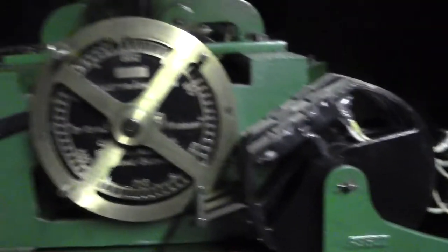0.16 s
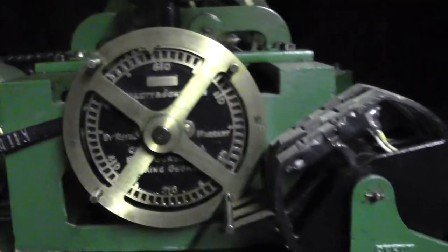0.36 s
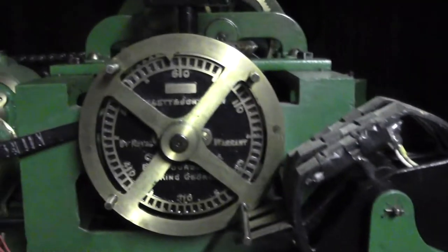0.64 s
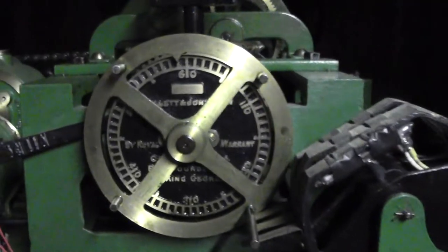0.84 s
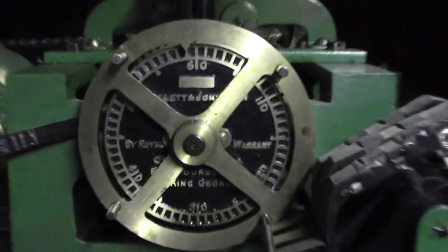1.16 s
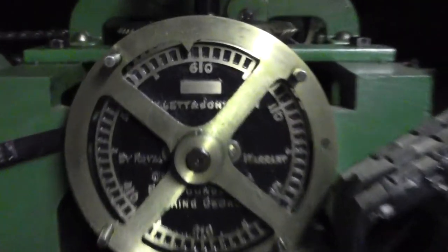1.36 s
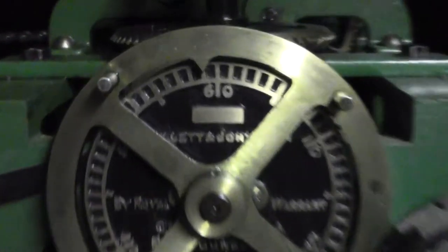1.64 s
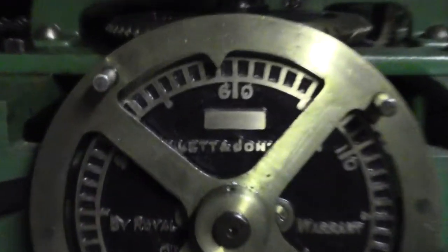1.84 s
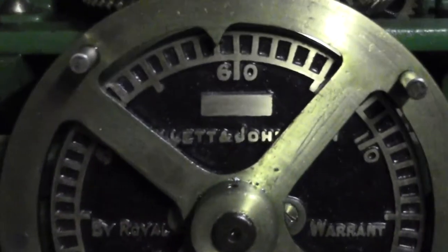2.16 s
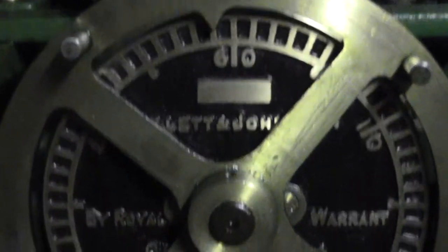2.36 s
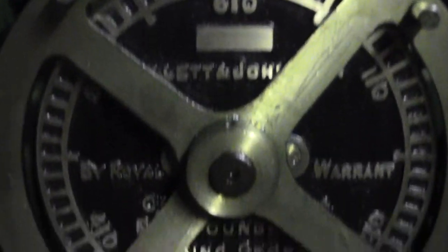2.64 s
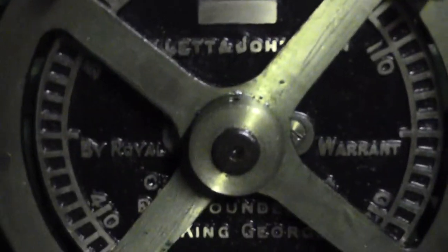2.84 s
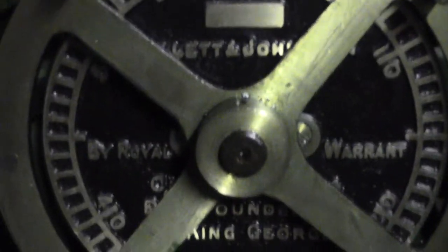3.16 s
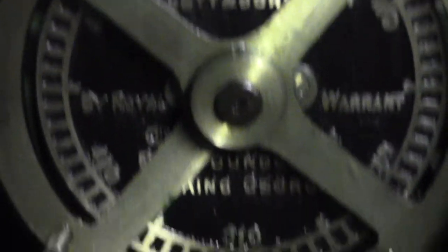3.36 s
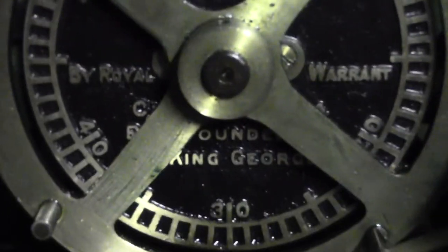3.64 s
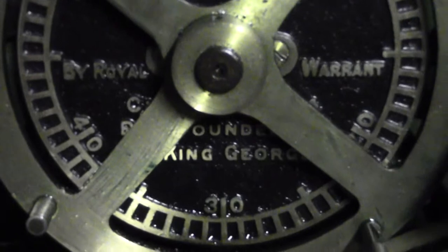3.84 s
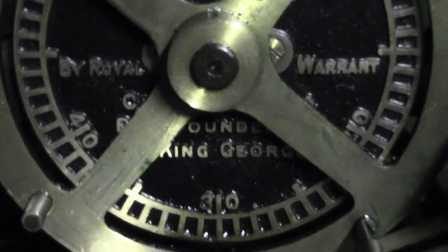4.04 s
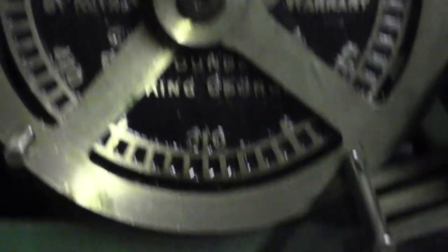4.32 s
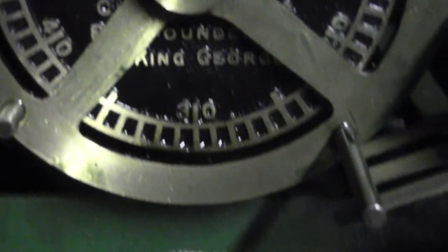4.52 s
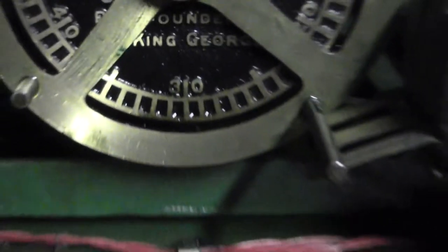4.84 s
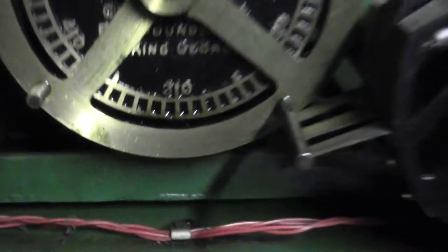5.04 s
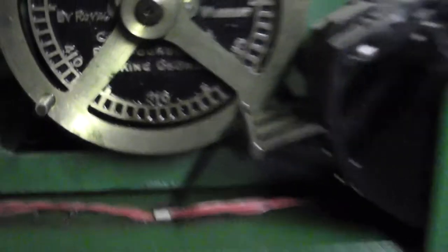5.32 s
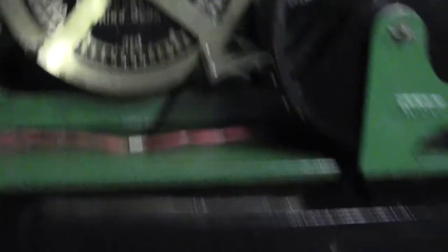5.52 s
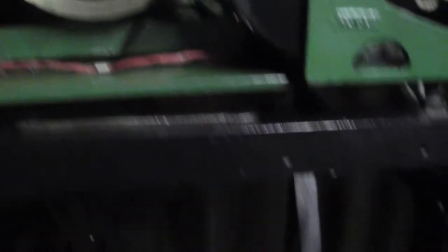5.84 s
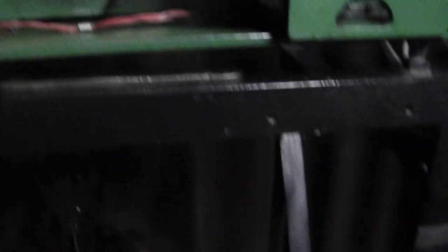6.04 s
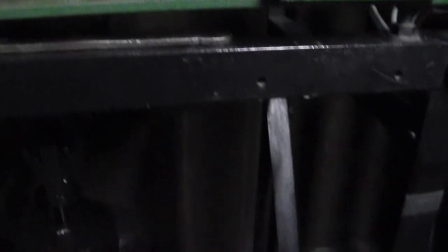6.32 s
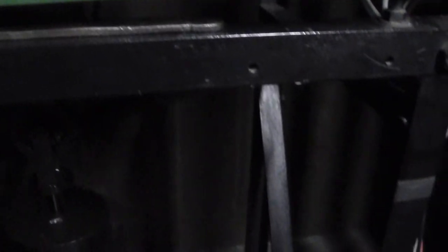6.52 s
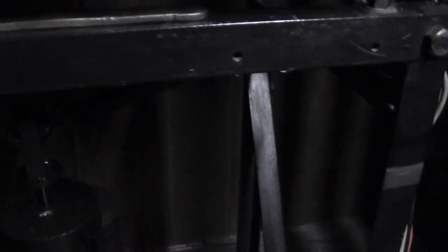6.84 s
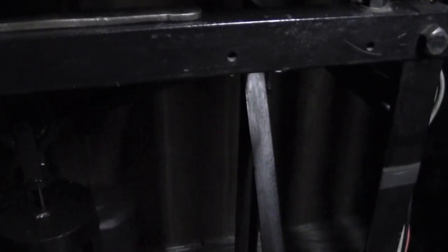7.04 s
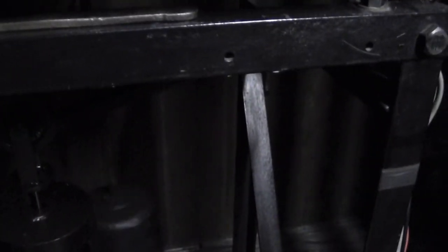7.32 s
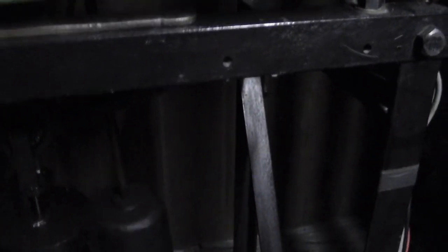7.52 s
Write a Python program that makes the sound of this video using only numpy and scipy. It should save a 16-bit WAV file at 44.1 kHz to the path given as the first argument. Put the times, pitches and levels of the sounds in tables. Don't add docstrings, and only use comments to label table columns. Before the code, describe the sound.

A heavy cast-iron clock movement runs close to a handheld microphone in a small, quiet stone-and-board room, over faint low road rumble and steady hiss. A soft double tap comes at 0.16 s. At about 0.7 s a bright click runs straight into a hard iron clack, then small rebounds and a brief metallic ring. This repeats each second, near 1.65, 2.7, 3.7, 4.75, 5.65 and 6.7, the two sides differing slightly; 4.77 is hardest, 6.74 loose and chattery. Quiet taps fall midway, near 1.15, 2.16, 3.15 and onward. A faint motor hum sounds from 0.95 to 2.05 and 4.7 to 5.75. A dull plastic click comes at 2.04, a sharp snap at 5.4. From 6 s low shuffling and thuds grow, with a snap at 6.9 and a faint shoe drag at 7 to 7.5. Finally cloth rustles, another unlocking click lands at 7.62, and a loud case knock at 7.65.

```python
import sys
import numpy as np
from scipy import signal
from scipy.fft import rfft, irfft
from scipy.io import wavfile
from scipy.ndimage import uniform_filter1d

SR = 44100
rng = np.random.default_rng(int(sys.argv[2]) if len(sys.argv) > 2 else 0)


def materialize(psi):
    bounded = np.clip(np.atleast_2d(psi).T, -1, 1)
    quanta = np.round(bounded * 32767).astype(np.int16)
    wavfile.write(sys.argv[1], SR, quanta)


def ratio(d):
    e = np.asarray(d, float) / 20
    return 10 ** e


N = 338688
TAIL = SR // 2

# (time [s], peak [dB], chatter [ms], treble over its kind's [dB])
LOCKS_A = [
    (0.753, -10, 4, -0.5),
    (2.745, -7.5, 7.3, -1),
    (4.7676, -6.5, 8, 0),
    (6.7356, -11.5, 18, -2),
]
LOCKS_B = [
    (1.6853, -7, 6.5, -1.3),
    (3.718, -8, 2.5, -1.5),
    (5.666, -7.5, 10.7, -2.3),
]
# (time [s], peak [dB], chatter [ms])
ARMS_A = [
    (1.1515, -29, 2.6),
    (3.151, -31.5, 2.9),
    (5.1512, -32, 4.7),
    (7.151, -30.5, 17),
]
ARMS_B = [
    (0.1604, -30, 2.4),
    (0.1894, -36, 7.3),
    (2.1586, -30, 3.8),
    (2.1869, -35, 3.7),
    (4.159, -29, 3.1),
    (4.187, -35.5, 4),
    (6.1584, -34, 5.2),
    (6.1894, -35.5, 4),
]


def level(x, db):
    return x * ratio(db) / np.sqrt(np.mean(x ** 2))


def peak(x, db):
    return x * ratio(db) / np.max(np.abs(x))


def read(table, hz):
    f, v = np.transpose(table)
    return np.interp(np.log(np.maximum(hz, 1)), np.log(f), v)


def band(x, lo_hz, hi_hz):
    return signal.sosfilt(signal.butter(2, [lo_hz, min(hi_hz, .45 * SR)], "band", fs=SR, output="sos"), x)


def coloured(spectrum):
    return irfft(rfft(rng.standard_normal(N)) * ratio(read(spectrum, np.fft.rfftfreq(N, 1 / SR))), N)


def walk(rate):
    k = int(SR / rate)
    steps = np.repeat(rng.standard_normal(N // k + 1), k)
    return level(uniform_filter1d(uniform_filter1d(steps, k), k)[:N], 0)


def fade(t60):
    return ratio(-60 * np.arange(TAIL) / SR / np.clip(t60, .003, .5))


def add(out, s, x):
    i = int(s * SR)
    out[..., i:i + x.shape[-1]] += x[..., :N - i]


def clock():
    # (time [s], peak [dB], chatter [ms])
    unlocks_a = [
        (0.688, -18.5, 6.8),
        (2.6806, -18.5, 4.1),
        (4.7082, -16.5, 6.8),
        (6.6737, -16.5, 2.8),
    ]
    unlocks_b = [
        (1.6228, -15.5, 2.4),
        (3.6344, -15.5, 2.7),
        (5.6006, -15.5, 5),
        (7.6231, -18.5, 6.5),
    ]
    rebounds_a = [(0.7209, -24, 3.5), (0.8244, -18, 2), (0.8624, -23.5, 3), (0.8844, -26.5, 8.6),
                  (2.7145, -23, 10), (2.8034, -24.5, 8.2), (2.8382, -21.5, 11), (4.7394, -29, 3.4),
                  (4.8144, -25.5, 6.4), (4.8481, -24, 20), (6.7064, -26.5, 17), (6.8087, -19, 3),
                  (6.8502, -24.5, 33)]
    rebounds_b = [(1.6641, -16, 3), (1.7432, -20, 5.9), (1.8023, -26, 8), (3.6715, -17, 2.2),
                  (3.7744, -23, 6.9), (3.8348, -25.5, 8.3), (3.8646, -28, 3.4), (5.6431, -20.5, 5.8),
                  (5.7317, -20.5, 4.1), (5.7745, -24.5, 2.6), (7.6664, -23.5, 10)]
    # (frequency [Hz], level [dB], t60 [s])
    unlock_a_modes = [(810, -20, .15), (1755, -13, .07), (3110, -9, .05), (2530, -4, .06), (2745, 0, .06),
                      (3736, -14, .15), (4194, -14, .08), (5110, -14, .06), (6998, -26, .14),
                      (7800, -26, .06), (10170, -30, .1), (11090, -30, .06), (13770, -36, .15)]
    unlock_b_modes = [(420, -18, .12), (851, -18, .2), (1540, -6, .07), (2132, -4, .06), (2745, 0, .075),
                      (2998, -8, .08), (3515, -18, .12), (4161, -14, .1), (5238, -22, .1), (6794, -28, .12),
                      (7763, -24, .08), (12970, -32, .05)]
    lock_a_modes = [(440, -8, .15), (964, -12, .18), (1346, -12, .25), (1663, -13, .2), (1760, -10, .2),
                    (2229, -12, .15), (2439, -5, .09), (2708, 0, .08), (2907, -12, .15), (3650, -20, .2),
                    (6971, -25, .16), (7865, -20, .1), (8538, -22, .12), (9114, -12, .13),
                    (10070, -16, .14), (11150, -28, .13), (12660, -28, .13), (13700, -23, .14)]
    lock_b_modes = [(430, -14, .15), (646, -13, .25), (824, -9, .25), (974, -12, .19), (1184, -13, .2),
                    (1540, -5, .15), (1610, -3, .06), (1992, -5, .09), (2110, -7, .08), (2460, -9, .1),
                    (2729, 0, .06), (4210, -20, .12), (4780, -20, .12), (6907, -23, .14), (7865, -24, .13),
                    (8522, -22, .12), (10190, -15, .07), (13910, -21, .1)]
    rebound_a_modes = [(470, -13, .13), (960, -13, .13), (1760, -9, .12), (2450, -2.5, .1),
                       (2740, -2.5, .12), (3640, -7.5, .17), (3790, -7, .07), (6970, -28, .14),
                       (10150, -28, .13), (11100, -26, .05), (13750, -29, .13)]
    rebound_b_modes = [(430, -14, .12), (830, -9, .2), (1550, -3.5, .1), (2130, -2.5, .08),
                       (2460, -2.5, .12), (2740, 0, .1), (3000, -5, .12), (3500, -11, .12),
                       (6900, -24, .15)]
    arm_a_modes = [(646, -11, .25), (780, -4, .35), (1760, -3, .08), (2030, -9, .14), (2740, -11, .1),
                   (3000, -1, .14)]
    arm_b_modes = [(646, -8, .2), (813, -3, .25), (1430, -16, .15), (2140, 0, .075), (2420, -11, .08),
                   (2780, -13, .08), (4430, -17, .06)]
    # (bass [dB], upper [dB], treble [dB]) against its body
    unlock_a_db = (-14.5, -1.5, -13)
    unlock_b_db = (-13, -8.5, -16)
    lock_a_db = (-6, -12, 1.2)
    lock_b_db = (-6.5, -13.5, 1)
    rebound_a_db = (-5.5, -5, -7.5)
    rebound_b_db = (-10, -12, -16)
    arm_a_db = (-13.5, -18, -16)
    arm_b_db = (-11.5, -22, -18)
    # (frequency [Hz], density [dB per Hz])
    soft = [(250, -24), (420, -13), (1200, -9), (2000, -5), (2800, 0), (3600, -7), (4800, -11), (6000, -19),
            (11000, -25), (16000, -38)]
    hard = [(250, -24), (420, -5), (900, -2), (1600, 0), (2700, 0), (4200, -13), (6000, -14), (9500, -11),
            (13000, -17.5), (16000, -26)]

    unlock = blows(unlocks_a, unlock_a_db, unlock_a_modes, soft, hiss_db=0.5)
    unlock += blows(unlocks_b, unlock_b_db, unlock_b_modes, soft, hiss_db=0.27)
    lock = blows(LOCKS_A, lock_a_db, lock_a_modes, hard, hiss_db=0.77)
    lock += blows(LOCKS_B, lock_b_db, lock_b_modes, hard, hiss_db=6.4)
    rebound = blows(rebounds_a, rebound_a_db, rebound_a_modes, soft, hiss_db=0.82)
    rebound += blows(rebounds_b, rebound_b_db, rebound_b_modes, soft, hiss_db=0.45)
    arm = blows(ARMS_A, arm_a_db, arm_a_modes, soft, hiss_db=-10.5)
    arm += blows(ARMS_B, arm_b_db, arm_b_modes, soft, hiss_db=-10.0, ring_share=0.75)
    return unlock + lock + rebound + arm


def blows(events, colour_db, modes, frame, hiss_db, ring_share=1):
    # (frequency [Hz], t60 [s])
    frame_t60 = [(300, 0.85), (1000, 0.22), (2500, 0.12), (6000, 0.2), (14000, 0.23)]
    bands_hz = 250 * 2 ** np.arange(0, 6.1, .5)
    out, t = np.zeros(N), np.arange(TAIL) / SR
    hz, db, t60 = np.transpose(modes)[:, :, None]
    t60 = t60 * ring_share
    decay = fade(0.42 * t60) + ratio(-3) * fade(t60)
    off_mode = (np.fft.rfftfreq(TAIL, 1 / SR) - hz) / (.013 * hz + 30)
    resonance = ratio(-6) + np.sum(1 / (1 + off_mode ** 2), axis=0)
    weight = ratio(read(frame, bands_hz)) * np.sqrt(bands_hz) * (-1) ** np.arange(len(bands_hz))
    bass_db, upper_db, treble_db = colour_db
    for s, peak_db, chatter_ms, *bright_db in events:
        size, split = rng.standard_normal((2, len(modes), 1))
        beat_hz = hz * .012 * (split + .4 * np.sign(split))
        pair = 1 + .5 * np.cos(2 * np.pi * beat_hz * t)
        jolts = np.repeat(rng.standard_normal((len(modes), TAIL // 256 + 1)), 256, axis=1)[:, :TAIL]
        pair = pair * (1 + np.minimum(t / .02, .9) * uniform_filter1d(jolts, size=256, axis=1))
        strength = ratio(db + 2 * size + 5.5 * (hz > 6000))
        ring = np.sum(strength * np.sin(2 * np.pi * hz * t) * pair * decay, axis=0)

        late = np.maximum(np.arange(TAIL) - int(chatter_ms * SR / 1000), 0)
        fine_grain_db = 1.33 * np.repeat(rng.standard_normal(TAIL // 30 + 1), 30)[:TAIL]
        coarse_grain_db = .8 * np.repeat(rng.standard_normal(TAIL // 64 + 1), 64)[:TAIL]
        noise = rng.standard_normal(TAIL) * ratio(fine_grain_db)
        noise = irfft(rfft(noise) * resonance, TAIL) * ratio(coarse_grain_db)
        noise = noise * (fade(0.021)[late] + ratio(11.5))
        hiss = np.zeros(TAIL)
        for f, w in zip(bands_hz, weight):
            strip = level(band(noise, f / 1.254, f * 1.098), 0)
            hiss += w * strip * fade(read(frame_t60, f))[late]

        x = (level(ring, 0) + level(hiss, hiss_db)) * (1 - np.exp(-t / 0.001))
        body, treble = again(s)
        swell = 1 - 0.61 * np.exp(-t / 0.0077)
        parts = peak(band(x * body, 1200, 3400), 0)
        parts -= peak(band(x * swell, 250, 1100), bass_db)
        parts += peak(band(x * treble, 6000, 16500), treble_db + sum(bright_db))
        parts -= peak(band(x * body, 3400, 6000), min(upper_db, -5))
        add(out, s, peak(favour(parts, s), peak_db + 3.0))
    return out


def again(s):
    # (time of the blow [s], delay [ms], body over ring [dB], treble over ring [dB])
    restrikes = [(.16, 5.1, 0, 9), (.688, 9.5, -8, 0), (.753, 7.2, -5, -7), (.753, 23, -6, 0),
                 (1.685, 6, 2, -2), (2.16, 6, 7, -6), (2.681, 16, -9, -4), (2.745, 11.5, -3, -7),
                 (3.634, 9.8, -8, 0), (3.718, 8, 2, -4), (4.16, 4.5, 2, -6), (4.708, 9, -1, -4),
                 (4.768, 4.8, 2, -20), (5.601, 9.6, -3, -8), (5.666, 11.4, -2, -1), (6.158, 8.5, 8, -6),
                 (6.674, 9, -3, 0), (6.735, 12, -2.5, 2), (7.623, 8.5, 2, -3), (6.809, 6, 6, -6)]
    crack = fade(0.027)
    body, treble = 1 + ratio(-4) * crack, 1 + ratio(0.5) * crack
    for at, delay_ms, body_db, treble_db in restrikes:
        if abs(at - s) < .006:
            jolt = np.roll(fade(0.046), int(delay_ms * SR / 1000))
            body, treble = body + ratio(body_db) * jolt, treble + ratio(treble_db) * jolt
    return body, treble


def favour(x, s):
    # (time of the blow [s], frequency [Hz], gain [dB])
    favours_main = [(0.688, 1780, -10), (0.688, 2010, -10.0), (0.688, 3120, 6), (0.688, 4880, -10.0),
                    (0.753, 570, -10.0), (0.753, 2400, -10.0), (0.753, 2680, -8), (1.623, 674, 12),
                    (1.623, 1800, 10.0), (1.623, 2060, 8), (1.623, 4250, -9.0), (1.685, 1240, -10.0),
                    (1.685, 1550, 5), (1.685, 2030, -10.0), (1.685, 2540, -12), (2.681, 1590, 5),
                    (2.681, 2080, 13), (2.681, 2700, 12), (2.681, 3010, 11), (2.745, 570, -9.0),
                    (2.745, 1410, -8), (2.745, 1960, 16.5), (2.745, 2250, -10), (3.634, 1540, -9),
                    (3.634, 2030, 8), (3.634, 3130, 7), (3.634, 3400, -10.0), (3.718, 1200, -17),
                    (3.718, 1540, 6), (3.718, 1800, 9.0), (3.718, 2720, 8), (4.708, 1990, -10.0),
                    (4.708, 2810, 14.5), (4.708, 3140, 14), (4.708, 4080, 10.0), (4.768, 420, -12),
                    (4.768, 1550, 7), (4.768, 1930, 9.0), (4.768, 2624, 17), (5.601, 1510, -9.0),
                    (5.601, 2570, -21), (5.601, 3080, -12), (5.601, 4060, 17), (5.666, 655, -8),
                    (5.666, 1120, -10), (5.666, 1500, -11), (5.666, 1930, 8.0), (6.674, 2760, 12.5),
                    (6.674, 3230, 16), (6.674, 3720, -10.0), (6.674, 4170, 18), (6.735, 1020, -14),
                    (6.735, 1400, -12), (6.735, 1700, -14), (6.735, 2460, 10.5), (7.623, 1480, -6.0),
                    (7.623, 2190, -7.0), (7.623, 2460, 21), (7.623, 2930, 7)]
    favours_small = [(0.16, 1330, -10.0), (0.16, 2380, -12), (0.721, 533, -15), (0.721, 2970, 12),
                     (0.824, 2510, -10.0), (0.824, 3820, 15), (0.862, 950, -12), (0.862, 2480, -10.0),
                     (1.151, 730, -11), (1.151, 2885, 16.5), (1.664, 880, -7), (1.664, 2080, 10.0),
                     (1.743, 870, -9.0), (1.743, 2240, -10.0), (2.16, 865, -11), (2.16, 1950, 13),
                     (2.187, 1280, 10.0), (2.187, 2420, 8.0), (2.717, 950, -10.0), (2.717, 2470, -10.0),
                     (2.803, 600, -9.0), (2.803, 2650, 10.0), (2.838, 1800, -10.0), (2.838, 3590, 10.0),
                     (3.151, 3000, 9), (3.671, 1560, -9.0), (3.671, 2030, 14), (3.774, 1780, 11),
                     (3.774, 2500, -8.0), (4.16, 920, -8), (4.16, 2320, -13), (4.814, 1720, -5.0),
                     (4.814, 2900, 15), (4.848, 2360, 12), (5.152, 360, 8.0), (5.152, 770, -13),
                     (5.643, 1700, 14), (5.643, 2460, 13), (5.732, 1990, 16), (6.158, 790, -13),
                     (6.158, 2010, 11), (6.189, 640, -14), (6.189, 1360, 22), (6.809, 1690, -6),
                     (6.809, 2400, 18), (6.85, 960, -14), (6.85, 2450, 9), (7.148, 830, -13)]
    favours_fine = [(0.189, 2080, -6.0), (0.688, 1820, -8.0), (0.688, 4280, -10.0), (0.753, 390, 6),
                    (0.753, 2900, 9), (0.862, 3900, -10.0), (0.884, 1410, 16), (1.623, 4170, -8.0),
                    (1.685, 2940, 12), (2.681, 2930, 8.0), (2.681, 3200, 10.0), (2.745, 2080, 10.0),
                    (2.745, 2610, 13), (3.634, 3520, -10), (3.634, 5180, 8), (3.718, 1550, 8.5),
                    (3.718, 2240, -10.0), (3.718, 5640, 15), (3.865, 2600, 12), (4.187, 2140, -9),
                    (4.708, 2140, 9.0), (4.768, 1050, 5.5), (4.768, 1990, 8), (4.768, 2310, 8),
                    (5.601, 1850, -11), (5.601, 3080, -9.0), (5.666, 467, 9), (5.666, 2700, 9.5),
                    (5.666, 2960, 11), (6.674, 2470, 8), (6.674, 2920, 8), (6.735, 970, -9),
                    (6.735, 1230, -10.0), (6.735, 2560, 7), (6.809, 2500, 12)]
    share, width_hz, t60_s = 0.66, 98, 0.21
    for at, hz, db in favours_main + favours_small + favours_fine:
        if abs(at - s) < .006:
            x = x + (ratio(share * db) - 1) * band(x, hz - width_hz, hz + width_hz) * fade(t60_s)
    return x


def stand():
    out, t = np.zeros(N), np.arange(TAIL) / SR
    for s, peak_db, *_ in LOCKS_A + LOCKS_B:
        shake = band(rng.standard_normal(TAIL), 71, 293) * fade(0.63) * (1 - np.exp(-t / 0.0096))
        add(out, s, peak(shake, peak_db - 29.5))
    for s, peak_db, _ in ARMS_A + ARMS_B:
        thud = band(rng.standard_normal(TAIL), 376, 830) * fade(0.6) * (1 - np.exp(-t / 0.018))
        add(out, s, peak(thud, peak_db - 10))
    return out


def ticks():
    # (time [s], peak [dB], centre [Hz], t60 [s])
    contacts = [(1.1543, -44, 11500, .02), (2.167, -36, 9000, .012), (2.1722, -41, 10500, .05),
                (3.1543, -44, 11500, .02), (4.1668, -45, 11500, .012), (4.1715, -41, 11500, .04),
                (5.1547, -36, 12000, .012), (7.1545, -43, 13000, .012), (7.149, -40, 4900, .07),
                (6.158, -43, 4700, .09), (6.521, -41, 2050, .25), (6.9, -25, 5000, .014),
                (6.518, -38, 950, .12)]
    out = np.zeros(N)
    for s, db, hz, t60 in contacts:
        add(out, s, peak(band(rng.standard_normal(TAIL), hz / 1.3, hz * 1.3) * fade(t60), db))
    return out


def case():
    # (time [s], peak [dB], pitch [Hz], t60 [s], treble snap over it [dB])
    clicks = [
        (2.0405, -26, 1080, 0.014, -24),
        (4.643, -47, 1750, 0.012, -19),
        (3.9, -44, 1300, 0.02, -40),
        (5.3998, -22, 1300, 0.025, 7),
        (6.9, -21, 1700, 0.016, 0),
        (7.5698, -24, 2900, 0.0097, 2),
        (7.6526, -14, 1380, 0.0093, -7),
        (7.6764, -22.5, 4300, 0.013, 4),
        (7.5905, -29.5, 1160, .006, -25),
        (7.5, -38.5, 1400, .07, -30),
    ]
    out = np.zeros(N)
    for s, db, hz, t60, snap_db in clicks:
        noise = rng.standard_normal(TAIL)
        add(out, s, peak(band(noise, hz / 1.63, hz * 1.68) * fade(t60), db))
        add(out, s, peak(band(noise, 3200, 11500) * fade(0.3 * t60), db + snap_db))
    return out


def handling():
    # (time [s], peak [dB], pitch [Hz], t60 [s], scuff over it [dB])
    thumps = [(4.082, -41, 117, 0.5, 0.5), (4.19, -33, 258, 0.36, -15), (5.4, -29.5, 222, 0.021, 4.5),
              (5.502, -35.5, 203, 0.31, -17), (6.325, -33, 296, 0.35, -9), (6.355, -39, 508, 0.088, -9),
              (6.518, -27.5, 291, 0.14, -22), (6.53, -32, 115.4, 0.48, -30), (6.639, -30, 112, 0.12, -30),
              (6.04, -38.5, 557, 0.11, 0), (6.611, -31.5, 596, 0.16, -8), (7.375, -36, 416, 0.61, -22),
              (7.5905, -23, 163, 0.024, -19), (7.652, -13.5, 252, 0.095, -2)]
    # (start [s], length [s], rustle [dB], dull rub over it [dB])
    brushes = [
        (2.552, 0.092, -47, 7),
        (4.075, 0.096, -54.5, 12.5),
        (5.98, 0.14, -56.5, -6),
        (7.54, 0.2, -44, -5),
    ]
    out, t = np.zeros(N), np.arange(TAIL) / SR
    for s, db, hz, t60, scuff_db in thumps:
        noise = rng.standard_normal(TAIL)
        knock = np.sin(2 * np.pi * hz * t) + 1.3 * level(band(noise, hz / 1.47, hz * 1.84), 0)
        scuff = band(noise, 210, 3130) * fade(1.05 * t60)
        add(out, s, peak(knock * fade(t60), db) + peak(scuff, db + scuff_db))
    cloth = rng.standard_normal(N) * ratio(2.4 * walk(460) + 1.1 * walk(60))
    cloth = level(band(cloth, 1500, 9400), 0.66)
    rub = level(band(rng.standard_normal(N) * ratio(2.0 * walk(120)), 320, 1060), -2.7)
    for s, length, db, rub_db in brushes:
        times = s + length * np.array([0, .25, 1])
        shape_db = np.interp(np.arange(N) / SR, times, [-7, 0, -7], left=-80, right=-80)
        out += ratio(db + shape_db) * (cloth + ratio(rub_db) * rub)
    return out


def drags():
    # (on [s], off [s], pitch [Hz], level [dB])
    scrapes = [
        (6.99, 7.17, 470, -48),
        (7.15, 7.48, 520, -48.5),
        (7, 7.15, 1270, -55),
    ]
    t, out = np.arange(N) / SR, 0
    for on, off, hz, db in scrapes:
        squeak = level(band(rng.standard_normal(N), hz - 40, hz + 40) * ratio(0.76 * walk(30)), db)
        out = out + squeak * np.clip(np.minimum(t - on, off - t) / 0.035, 0, 1)
    return out


def stir():
    # (time [s], shuffle [dB])
    movement = [(0, -51.5), (1, -53), (1.5, -54), (2.3, -52), (3.4, -54), (4.2, -53), (4.6, -52.5),
                (5.05, -49), (5.5, -51.5), (6, -43.5), (6.4, -53.5), (6.6, -44.5), (7.05, -46), (7.3, -51),
                (7.68, -45.5)]
    s, db = np.transpose(movement)
    db = np.interp(np.arange(N) / SR, s, db)
    low = level(band(rng.standard_normal(N), 64, 497) * ratio(2 * walk(25)), -3.0)
    upper = level(band(rng.standard_normal(N), 400, 2180) * ratio(2.8 * walk(45)), -5)
    return low * ratio(db + 1.5) + upper * ratio(db - 0.5)


def tones():
    # (on [s], off [s])
    spans = [
        (.95, 2.05),
        (4.72, 5.75),
        (.285, .5),
        (.5, .58),
        (.595, .72),
        (0, 1.7),
    ]
    # (frequency [Hz], level [dB], pitch waver [0-1])
    lines = [
        (226, -53.5, .002),
        (226, -55, .002),
        (1066, -57, .004),
        (1062, -59, .004),
        (1088, -54, .004),
        (2815, -71, .002),
    ]
    t, out = np.arange(N) / SR, 0
    for (on, off), (hz, db, waver) in zip(spans, lines):
        gate = np.clip(np.minimum(t - on, off - t) / .02, 0, 1)
        loudness = ratio(db + 3 * walk(28) * (hz > 400) + .5 * walk(13))
        phase = 2 * np.pi * np.cumsum(hz * (1 + waver * walk(20))) / SR
        out = out + gate * loudness * np.sin(phase)
    return out


def room(x):
    def echo(lo_hz, hi_hz, t60_s):
        response = band(rng.standard_normal(TAIL), lo_hz, hi_hz) * fade(t60_s)
        return signal.fftconvolve(x, response / np.sqrt(np.sum(response ** 2)))[:N]

    tail_db = -13.5
    mid, side = echo(200, 4960, 0.37), echo(200, 4960, 0.37)
    glint, slap = echo(8200, 26000, 0.057), echo(500, 2300, 0.014)
    apart = ratio(tail_db - 29) * side + ratio(-15) * glint + ratio(-29) * slap
    return x + ratio(tail_db) * mid + np.array([apart, -apart])


def air():
    # (frequency [Hz], density [dB per Hz])
    mid_spectrum = [(11, -47), (18, -15), (66, 0.5), (107, -10), (229, -11), (341, -40), (819, -14),
                    (1090, -19), (1570, -33), (2760, -31.5), (3270, -27.5), (6450, -29.5), (15500, -38.5)]
    side_spectrum = [(12, -53.5), (20, -9), (70, -2), (216, -5), (277, -9), (319, -8), (574, -13.5),
                     (660, -13), (897, -17.5), (3530, -29), (16000, -39)]
    mid, side = level(coloured(mid_spectrum), -52), level(coloured(side_spectrum), -54.5)
    pair = np.array([mid + side, mid - side])
    road = signal.sosfiltfilt(signal.butter(2, 130, fs=SR, output="sos"), pair)
    return road * ratio(1.5 * walk(4.1)) + (pair - road) * ratio(-0.1 * walk(5.08))


def scene():
    case_room = ratio(-8)
    works, clicks = clock() + stand(), case()
    heard = room(works + case_room * clicks + handling() + stir() + drags())
    return heard + (1 - case_room) * clicks + tones() + air() + ticks()


def band_limit(x):
    return signal.sosfilt(signal.butter(12, 16660, fs=SR, output="sos"), x)


def record(dry):
    top = signal.ellip(6, .3, 50, 15600, fs=SR, output="sos")
    mix = signal.sosfilt(top, dry)
    return band_limit(mix)


dry = scene()
out = record(dry)
materialize(out)
```